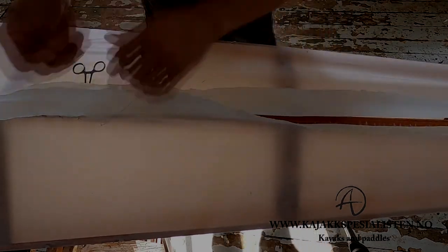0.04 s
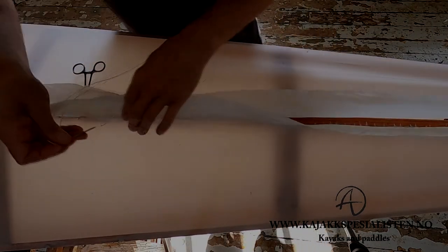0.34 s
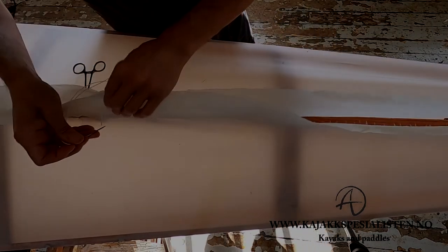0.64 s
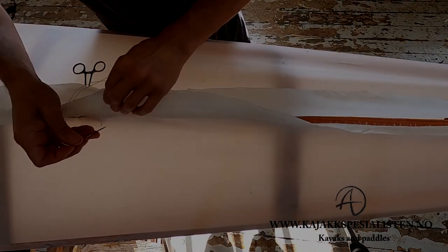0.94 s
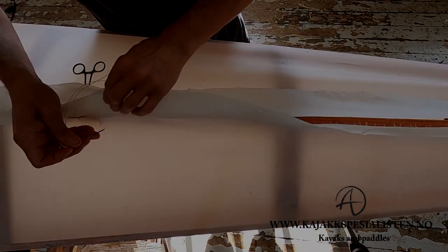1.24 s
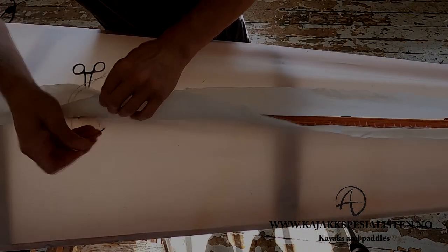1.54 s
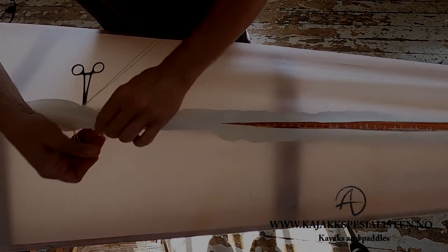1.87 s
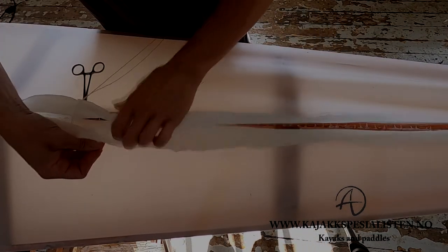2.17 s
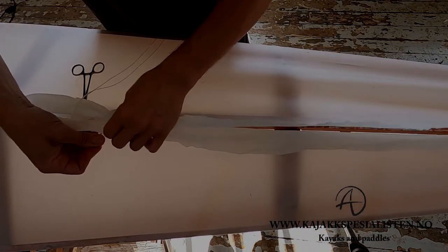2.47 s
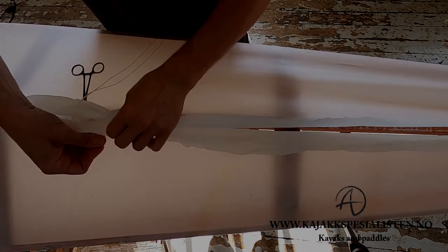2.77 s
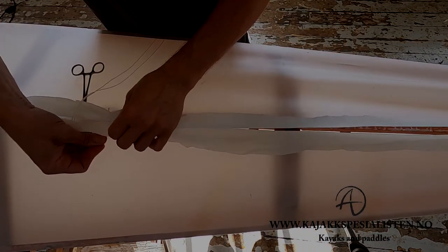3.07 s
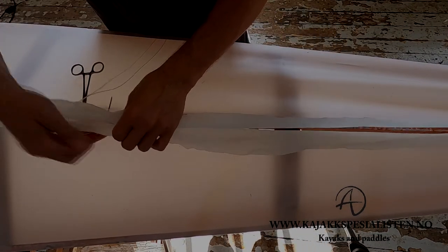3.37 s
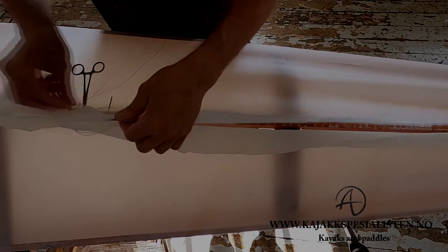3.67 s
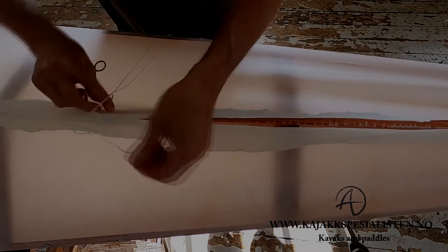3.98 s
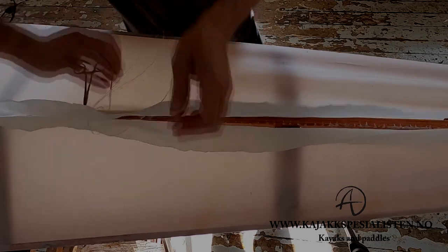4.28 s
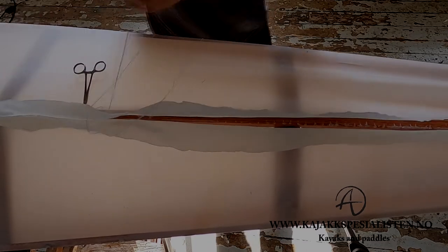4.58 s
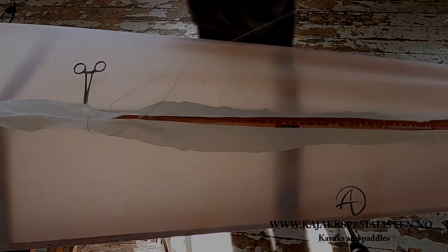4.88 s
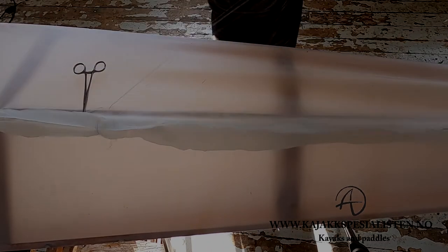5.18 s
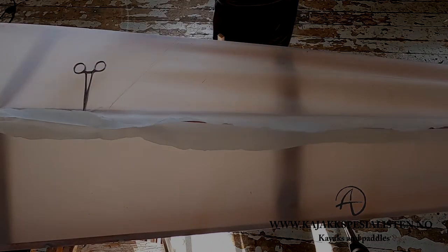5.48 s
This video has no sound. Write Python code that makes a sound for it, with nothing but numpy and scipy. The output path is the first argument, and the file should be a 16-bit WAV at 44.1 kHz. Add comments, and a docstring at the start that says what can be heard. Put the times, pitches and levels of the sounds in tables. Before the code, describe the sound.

In a small workshop, hands close to the microphone rub and scuff cloth stretched over a hollow frame. A faint fingertip squeak comes early, then a brief judder and scattered soft knocks and ticks. After a quieter stretch come a few firmer knocks. Near the end a long thread is drawn through the weave in a rising zip, creaks as it tightens and snaps home.

```python
"""In a small workshop, hands close by sew a cloth skin onto a hollow boat frame.
Sliding friction makes palms rub and scuff the cloth; stick-slip motion makes it squeak and judder.
Fingers knock on the taut skin and excite the damped modes of the frame. A long thread is drawn
through the weave in a zip whose pitch rises with its speed, until the stitch creaks and snaps tight."""
import sys
import numpy as np
from scipy import signal
from scipy.fft import rfft, irfft, next_fast_len
from scipy.io import wavfile
from scipy.ndimage import uniform_filter1d, map_coordinates

SR = 44100
rng = np.random.default_rng(int(sys.argv[2]) if len(sys.argv) > 2 else 0)


def to_wav(s):
    """Save 16-bit WAV."""
    ch = np.atleast_2d(s).T  # columns
    pcm = np.round(np.clip(ch, -1, 1) * 32767)  # PCM
    wavfile.write(sys.argv[1], SR, pcm.astype(np.int16))


N = 252252
TIME = np.arange(N) / SR


def amp(db):
    """Decibels to amplitude gain."""
    return 10 ** (np.asarray(db) / 20)


def unit(x):
    """Normalisation to rms 1."""
    return x / np.sqrt(np.mean(x ** 2) + 1e-20)


def along(points, hz):
    """Interpolation of (Hz, value) points on a log frequency axis."""
    freqs, values = np.transpose(points)
    return np.interp(np.log(hz + 1), np.log(freqs + 1), values)


def curves(rows):
    """Linear interpolation: one value per sample for each column after the time."""
    times, *columns = np.transpose(rows)
    return [np.interp(TIME, times, column) for column in columns]


def during(rows):
    """A soft-edged gate, open while a table lasts."""
    return uniform_filter1d(1. * ((TIME > rows[0][0]) & (TIME < rows[-1][0])), size=500)


def wobble(rate):
    """Smooth random modulation with rate knots a second."""
    return map_coordinates(rng.standard_normal(int(N * rate / SR) + 4), [np.arange(N) * rate / SR])


def narrowband(phase, width_hz):
    """Random modulation spreads a carrier into a band of noise."""
    return wobble(width_hz) * np.sin(phase) + wobble(width_hz) * np.cos(phase)


def filtered(x, response):
    """Filtering by multiplication in the frequency domain."""
    size = next_fast_len(N + SR // 4)
    return irfft(rfft(x, size) * response(np.fft.rfftfreq(size, 1 / SR)), size)[:N]


def coloured(x, spectrum):
    """Spectral shaping by (Hz, dB) points, at rms 1."""
    return unit(filtered(x, lambda hz: amp(along(spectrum, hz))))


def add(track, s, sound):
    """Superposition of a sound on a track at s seconds."""
    part = track[max(round(s * SR), 0):][:len(sound)]
    part += sound[:len(part)]


def ring(hz, t60):
    """A damped oscillation that swells to a peak of about 1 as a soft contact pushes."""
    t = TIME[:SR // 3]
    decay = np.log(1000) * t / t60
    return decay * np.exp(1 - decay) * np.sin(2 * np.pi * hz * t)


def burst(low_hz, high_hz, t60):
    """Band-limited noise in exponential decay."""
    t = TIME[:SR // 3]
    high = min(high_hz, SR / 4)
    band = signal.butter(2, [min(low_hz, high / 2), high], "band", fs=SR)
    return unit(signal.lfilter(*band, rng.standard_normal(len(t)))) * np.exp(-np.log(1000) * t / t60)


def friction(catch_rate, catch_db, clump_db):
    """Friction noise: countless fibres slip in clumps, with single catches among them."""
    catches = (rng.random(N) < catch_rate / SR) * rng.standard_normal(N)
    slips = rng.standard_normal(N) + amp(catch_db) * unit(catches)
    return unit(slips * amp(clump_db * wobble(130)))


def patchy(x, depth_db):
    """Time-varying filtering: as the contact shifts, brief peaks wander through its spectrum."""
    spectra = signal.stft(x, nperseg=1024)[2]
    field = uniform_filter1d(rng.standard_normal(spectra.shape), size=5, axis=0)
    field = uniform_filter1d(field, size=6, axis=1)
    return signal.istft(spectra * amp(depth_db * unit(field)), nperseg=1024)[1][:N]


def pitched_friction(run, blur, blur_db, overtone_db):
    """Periodic excitation: pitch is the rate of ridges or slips, and unevenness smears it to a rasp."""
    hz, db = curves(run)
    mean_hz = np.mean(np.transpose(run)[1])
    phase = 2 * np.pi * np.cumsum(hz * (1 + .014 * wobble(45))) / SR
    core = np.sin(phase) + .7 * narrowband(phase, width_hz=130)
    rasp = amp(blur_db) * narrowband(phase, blur * mean_hz)
    overtone = amp(overtone_db) * (hz / mean_hz) ** 4 * narrowband(2 * phase, blur * mean_hz)
    return during(run) * amp(db) * (core + rasp + overtone) / np.sqrt(1 + amp(2 * blur_db))


# Hand strokes. Each row: start and length in seconds, then body, rasp, hiss, treble lift and swell in dB.
HAND_STROKES = [(0.0, 0.23, -42, -40.5, -44, -0.5, 1.5), (0.23, 0.25, -45, -40, -44.5, 6, 2.5),
                (.54, 0.19, -45.5, -47.5, -49, 2.5, -2), (1.024, 0.099, -61, -62, -57, 5, -4),
                (1.477, 0.16, -50.5, -52.5, -49.5, 0, 9.5), (1.684, 0.038, -35, -37.5, -49, 3, 0.5),
                (1.866, .06, -43, -51, -54, -6, -9), (1.962, 0.13, -46, -43.5, -43.5, -1.5, -5),
                (2.167, 0.16, -42, -41.5, -43.5, 2, 4), (2.416, .13, -44.5, -48.5, -51, -5, 7),
                (2.65, 0.62, -51.5, -54, -57.5, -1, 4.5), (3.305, 0.055, -45, -42.5, -45.5, 0, -4),
                (3.451, 0.21, -42, -45, -44.5, 3.5, -3), (3.748, 0.14, -41, -40, -39.5, 2.5, -5.5),
                (3.966, 0.22, -42, -43.5, -46, 1.5, -6), (4.225, .11, -40.5, -43, -42.5, 3.5, 4),
                (4.368, 0.25, -35, -33, -43.5, 2.5, -2), (5.101, 0.064, -29, -28, -27.5, -2, -3),
                (5.19, 0.29, -31, -32, -37.5, -7, -14), (5.575, .16, -49, -46.5, -57, 3, -1)]
# Faint steady friction of hands resting on the cloth, under the strokes. The entries: body, rasp, hiss and
# treble gain in dB.
FLOOR_DB = [-65.5, -64, -66, -69]


def stroke_gains():
    """Incoherent sources add in power: each stroke sets in, swells or eases, and dies away."""
    grip_db_per_s, release_db_per_s = 399, 87.5
    power = np.outer(amp(FLOOR_DB) ** 2, np.ones(N))
    for start, length, body_db, rasp_db, hiss_db, lift_db, swell_db in HAND_STROKES:
        held_db = swell_db * (np.clip((TIME - start) / length, 0, 1) - .5)
        grip_db = grip_db_per_s * np.maximum(start - TIME, 0)
        release_db = release_db_per_s * np.maximum(TIME - start - length, 0)
        gains = amp([body_db, rasp_db, hiss_db, hiss_db + lift_db])
        power += np.outer(gains ** 2, amp(held_db - grip_db - release_db) ** 2)
    return np.sqrt(power)


# Friction spectra of skin, weave and fibres. Each row: frequency in Hz, relative level in dB.
SKIN_SPECTRUM = [(50, -62), (120, -3), (250, -3.5), (450, -1.5), (650, -5.5), (1000, -14), (2500, -86)]
WEAVE_SPECTRUM = [(250, -60), (600, -3), (900, 1.5), (1550, 0), (2100, -7), (3000, -10), (5000, -28),
                  (12000, -56)]
FIBRE_SPECTRUM = [(1200, -1), (2500, 0), (3500, 3), (4500, -0.5), (5700, -2.5), (7300, -7.5), (9600, -12.5),
                  (12000, -16.5), (15800, -23)]


def rubbing():
    """Sliding friction of hands and thread drums the skin, rasps the weave and hisses in the fibres."""
    body_gain, rasp_gain, hiss_gain, treble_gain = np.hypot(stroke_gains(), pull_gains())
    pressure = amp(0.47 * wobble(35) - 1.69)
    skin_slips = patchy(friction(catch_rate=300, catch_db=-10.5, clump_db=2), depth_db=3.2)
    weave_slips = patchy(friction(catch_rate=300, catch_db=-8, clump_db=1.3), depth_db=3.5)
    fibre_slips = patchy(friction(catch_rate=760, catch_db=-4.5, clump_db=1.5), depth_db=2.1)
    body = body_gain * coloured(skin_slips, SKIN_SPECTRUM)
    rasp = rasp_gain * coloured(weave_slips, WEAVE_SPECTRUM)
    fibres = coloured(fibre_slips, FIBRE_SPECTRUM)
    treble = filtered(fibres, lambda hz: 1 - 1 / (1 + (hz / 6500) ** 6))
    hiss = hiss_gain * (fibres - treble) + treble_gain * treble
    return pressure * (body + rasp + hiss)


# Trailing thread. Each row: time in seconds, ridge rate in Hz, level in dB.
SLACK_RUN = [(0, 1900, -35), (.07, 1692, -49.5), (.13, 2030, -40), (.22, 1805, -52), (.33, 1277, -63)]


def slack_thread():
    """Irregular excitation: loose thread trails its ridges over the cloth, more rasp than tone."""
    return pitched_friction(SLACK_RUN, blur=.6, blur_db=4, overtone_db=-25)


# Weight put on the frame. Each row: time in seconds, level in dB.
LEANS = [(.03, -29.5), (.42, -33.5), (1.05, -46), (1.91, -25.5), (2.32, -30.5), (3.36, -30.5), (3.8, -32.5),
         (4.38, -28.5), (5.13, -23.5), (5.33, -31.5)]
# Spectra of the swaying frame and the room air. Each row: frequency in Hz, relative level in dB.
SWAY_SPECTRUM = [(10, -4.5), (24, 7.5), (40, -2.5), (65, -7), (100, -13), (180, -25.5), (600, -63)]
AIR_SPECTRUM = [(20, 1.5), (100, -5.5), (300, -8), (1000, -24), (3000, -45), (8000, -30.5), (16000, -37)]


def sway_and_air():
    """Damping lets the frame settle slowly after each lean, over the steady noise of the air."""
    lean_db_per_s, settle_db_per_s, steady_db = 102, 44, -45
    power = amp(steady_db) ** 2
    for s, db in LEANS:
        power += amp(db - np.maximum(lean_db_per_s * (s - TIME), settle_db_per_s * (TIME - s))) ** 2
    sway = np.sqrt(power) * coloured(rng.standard_normal(N), SWAY_SPECTRUM)
    return sway + amp(-53) * coloured(rng.standard_normal(N), AIR_SPECTRUM)


# Thread and fibres clicking free. Each row: time in seconds, level in dB, pitch in Hz.
FIBRE_TICKS = [(0.064, -33, 9100), (.113, -35, 9800), (1.109, -38, 1080), (1.219, -29.5, 2970),
               (1.354, -45, 6000), (1.4276, -32, 1510), (1.968, -24.5, 2400), (1.979, -23.5, 4000),
               (2.1766, -19, 2900), (2.304, -29, 12000), (2.323, -20.5, 3070), (2.8449, -38, 5040),
               (3.105, -32.5, 1470), (3.777, -24, 4450), (5.228, -20, 7370), (5.274, -26, 10070),
               (5.338, -31, 12000), (5.4516, -18, 9100), (5.495, -24.5, 10500), (5.534, -31, 10900),
               (5.5526, -33.5, 6500), (5.595, -19, 4160)]


def ticks():
    """Sudden release gives a heavily damped transient: about one cycle and a short fuzz."""
    out = np.zeros(N)
    for s, db, hz in FIBRE_TICKS:
        fuzz = amp(-12) * burst(0.039 * hz, 1.67 * hz, t60=0.019)
        add(out, s, amp(db) * (ring(hz, t60=2.3 / hz) + fuzz))
    return out


# Short hard strokes. Each row: centre in seconds, level in dB, half length in seconds,
# upper and lower cutoff in Hz.
CLOTH_SCUFFS = [(.248, -43, .013, 5000, 2000), (0.427, -36, 0.025, 9500, 1200),
                (0.545, -44, 0.025, 8000, 5000), (1.121, -45.5, 0.012, 1100, 250),
                (1.215, -39, 0.0098, 1550, 280), (1.427, -41.5, .0028, 2000, 300),
                (1.725, -30, 0.015, 1250, 350), (1.762, -30.5, 0.027, 1700, 200),
                (1.759, -36.5, 0.021, 8000, 6000), (3.301, -34, 0.016, 6500, 450),
                (4.621, -26, 0.02, 1600, 430), (5.114, -18, 0.0095, 2180, 298),
                (5.123, -24.5, 0.043, 5000, 500)]


def scuffs():
    """Brief sliding friction: each stroke is a Gaussian swell of band-limited noise."""
    out = np.zeros(N)
    for s, db, half, high_hz, low_hz in CLOTH_SCUFFS:
        band = lambda hz: hz / np.hypot(hz, low_hz) / (1 + (hz / high_hz) ** 2) / (1 + (hz / 11500) ** 5)
        stroke = unit(filtered(friction(catch_rate=2400, catch_db=-4, clump_db=1.5), band))
        out += amp(db) * np.exp(-((TIME - s) / half) ** 2 / 2) * stroke
    return out


# A sliding fingertip. Each row: time in seconds, slip rate in Hz, level in dB.
SQUEAK_RUN = [(.395, 750, -49), (.418, 964, -34.5), (.43, 1170, -30.5), (.445, 1166, -43), (.47, 645, -46),
              (.5, 563, -46), (.535, 643, -35), (.56, 548, -58)]


def fingertip_squeak():
    """Stick-slip oscillation of a fingertip on the skin, fast enough to be heard as a pitch."""
    return pitched_friction(SQUEAK_RUN, blur=.6, blur_db=-6, overtone_db=-15)


# Dragged cloth. Each row: start and end in seconds, peak level in dB, slips per second, ring in Hz.
CLOTH_JUDDERS = [(1.729, 1.786, -13.5, 170, 279), (5.096, 5.126, -15, 190, 487)]


def judders():
    """Slow stick-slip motion: the cloth lets go at uneven intervals, and each slip plucks the skin."""
    out = np.zeros(N)
    for start, end, db, rate, hz in CLOTH_JUDDERS:
        slips = start + np.cumsum(rng.uniform(0.721, 1.3, size=30)) / rate
        for s in slips[slips < end]:
            swell = np.sin(np.pi * (s - start) / (end - start))
            add(out, s, -amp(db) * swell * ring(hz, t60=0.0079))
    return out


def skin_rebound(width_s, cutoff_hz):
    """Tension as restoring force: the skin yields to a blow, then flicks back through rest at 20 ms."""
    t = TIME[:SR // 25] - 1 / 50
    return signal.lfilter(*signal.butter(2, cutoff_hz, fs=SR), -np.sign(t) * np.exp(-np.abs(t) / width_s))


# Modes of the covered frame. Each row: frequency in Hz, relative level in dB, t60 in seconds.
FRAME_MODES = [(39.5, -5, 0.18), (100.7, 5, 0.048), (191, -6, 0.039), (233.5, 5, 0.042), (379, -8, 0.055),
               (600, -10, 0.032)]
# Knocks on the skin. Each row: time in seconds, the struck spot's level in dB, pitch in Hz and
# t60 in seconds, fingertip tap in dB, push into the frame in dB.
FINGER_KNOCKS = [(1.849, -24.5, 279, 0.041, -16, -14.5), (1.9686, -29, 353, 0.01, -23.5, -24),
                 (2.2679, -24.5, 357, 0.0097, -34, -34), (2.345, -36, 584, 0.0099, -29, -43),
                 (3.3116, -17, 434, 0.013, -17, -28), (3.696, -29, 604, .006, -44, -43),
                 (3.793, -21.5, 256, 0.026, -39, -27), (4.261, -26, 440, 0.01, -29, -18),
                 (4.2974, -17, 483, 0.013, -12, -37), (4.3024, -10.5, 716, 0.0052, -40, -25),
                 (4.33, -20, 288, 0.0057, -35, -15.5), (4.337, -7, 317, 0.0096, -43, -4),
                 (5.192, -9, 527, 0.0041, -15, -14)]


def knocks():
    """Impact excites damped modes: the spot and fingertip ring, the cloth rustles, the frame booms."""
    out = np.zeros(N)
    for s, db, hz, t60, tap_db, push_db in FINGER_KNOCKS:
        boom = sum(amp(mode_db + rng.normal(0, 1.5)) * ring(mode_hz, mode_t60)
                   for mode_hz, mode_db, mode_t60 in FRAME_MODES)
        spot = amp(db) * ring(hz, t60)
        tap = amp(tap_db) * ring(hz=1040, t60=0.006)
        brush = np.hypot(amp(db), amp(tap_db)) * amp(-10) * burst(low_hz=200, high_hz=1200, t60=0.03)
        add(out, s, -(spot + tap + brush + amp(push_db - 16) * boom))
        add(out, s - 1 / 50, amp(push_db) * skin_rebound(width_s=0.0017, cutoff_hz=1200))
    return out


# Loose thread whipping over the cloth. Each row: centre in seconds, level in dB,
# half length in seconds, pitch in Hz, glide in octaves per second.
THREAD_SWISHES = [(2.172, -45.5, .012, 5860, -14.5), (3.573, -46, .03, 5770, 0.5),
                  (3.783, -43, .025, 5520, -1), (3.87, -47, .025, 4370, -3.5),
                  (3.99, -52, .025, 5800, -1.5)]


def swishes():
    """Narrowband friction noise swells and glides with the speed of the passing thread."""
    out = np.zeros(N)
    for s, db, half, hz, glide in THREAD_SWISHES:
        pitch_hz = hz * 2 ** (glide * np.clip(TIME - s, -2 * half, 2 * half))
        hiss = narrowband(2 * np.pi * np.cumsum(pitch_hz) / SR, width_hz=1300)
        out += amp(db) * np.exp(-((TIME - s) / half) ** 2 / 2) * hiss
    return out


# The needle creeping through the weave. Each row: time in seconds, level in dB.
NEEDLE_CREEP = [(2.4, -62), (2.55, -52.5), (2.75, -57.5), (2.95, -59.5), (3.1, -77)]
# Its resonances. Each row: frequency in Hz, width in Hz, relative level in dB.
NEEDLE_MODES = [(3240, 244, -5), (3420, 330, 0), (3910, 220, 0.5), (4380, 210, -2), (5380, 620, -9)]


def needle():
    """Resonance filters the needle's friction into a faint, narrow scratch."""
    peaks = lambda f: sum(amp(db) / (1 + ((f - hz) / (width / 2)) ** 2) for hz, width, db in NEEDLE_MODES)
    scratch = unit(filtered(friction(catch_rate=560, catch_db=-15, clump_db=1), peaks))
    return during(NEEDLE_CREEP) * amp(curves(NEEDLE_CREEP)[0]) * scratch


# Thread running through its hole. Each row: time in seconds, ridge rate in Hz, level in dB.
PULL_RUN = [(4.57, 1420, -46), (4.61, 1620, -32), (4.7, 1950, -40), (4.8, 2998, -30.5), (4.85, 3494, -34.5),
            (4.91, 4090, -32.5), (4.97, 4680, -39), (5.065, 5030, -32), (5.11, 4960, -52)]


def thread_zip():
    """Periodic excitation: the thread's twist bumps through the weave, so pitch rises with speed."""
    return pitched_friction(PULL_RUN, blur=.55, blur_db=-2.5, overtone_db=-18)


def pull_gains():
    """Friction hiss grows with speed: the running thread's four gains for rubbing()."""
    body_db, rasp_db, hiss_db, treble_db = -45.5, -38, -30, -33
    db_per_octave, reference_hz = 8, 4000
    speed_db = db_per_octave * np.log2(curves(PULL_RUN)[0] / reference_hz)
    levels_db = np.broadcast_arrays(body_db, rasp_db, hiss_db + speed_db, treble_db + speed_db)
    return during(PULL_RUN) * amp(levels_db)


# The closing stitch. Each row: time in seconds, slip rate in Hz, level in dB.
CREAK_RUN = [(4.9, 1054, -46), (4.95, 1163, -33.5), (4.985, 1084, -33), (5.03, 1238, -28.5),
             (5.06, 1195, -27), (5.1, 1144, -42)]


def stitch_creak():
    """Stick-slip oscillation of the tightening thread, with a strong second harmonic."""
    return pitched_friction(CREAK_RUN, blur=.6, blur_db=-8, overtone_db=-6)


# The stitch's last slips. Each row: time in seconds, level in dB, pitch in Hz, t60 in seconds.
SNAP_SLIPS = [(5.187, -25, 2860, 0.0018), (5.1868, -6.5, 2890, 0.0028), (5.188, -3.5, 2920, 0.0014),
              (5.1895, -10.5, 1870, 0.0035), (5.1948, -9, 1320, 0.002)]


def stitch_snap():
    """Impulsive excitation: the stitch jumps home in hard slips that fuse into one snap."""
    out = np.zeros(N)
    for s, db, hz, t60 in SNAP_SLIPS:
        crack = amp(-2.5) * burst(low_hz=700, high_hz=8800, t60=0.0039)
        add(out, s, amp(db) * (ring(hz, t60) + crack))
    return out


# The workshop's reverberation time. Each row: frequency in Hz, t60 in seconds.
ROOM_T60 = [(100, 0.2), (1000, 1), (4000, 0.94), (14000, 0.53)]


def reverberation(x):
    """Convolution with a diffuse tail that lasts longest in the midrange."""
    hz, t, spectra = signal.stft(rng.standard_normal(SR // 2), SR, nperseg=256)
    decay = np.exp(-np.log(1000) * t / along(ROOM_T60, hz)[:, None])
    tail = signal.istft(spectra * decay, SR, nperseg=256)[1]
    response = np.pad(tail, (SR // 200, 0)) / np.linalg.norm(tail)  # 5 ms late
    return signal.fftconvolve(x, response)[:N]


def scene():
    """Superposition of the close handwork and the room's weaker reverberation, in mono."""
    contacts = scuffs() + swishes() + judders() + knocks() + ticks() + stitch_snap()
    contacts += thread_zip() + slack_thread() + fingertip_squeak() + stitch_creak()
    sliding = rubbing()
    room = reverberation(amp(-12.5) * contacts + amp(-16) * sliding)
    return (contacts + sliding + room + needle() + sway_and_air())[None]


def record(dry):
    """Hard clipping at full scale, followed by a sharp band limit."""
    return filtered(np.clip(dry[0], -1, 1), lambda hz: hz < 15900)[None]


dry = scene()
out = record(dry)
to_wav(out)
```